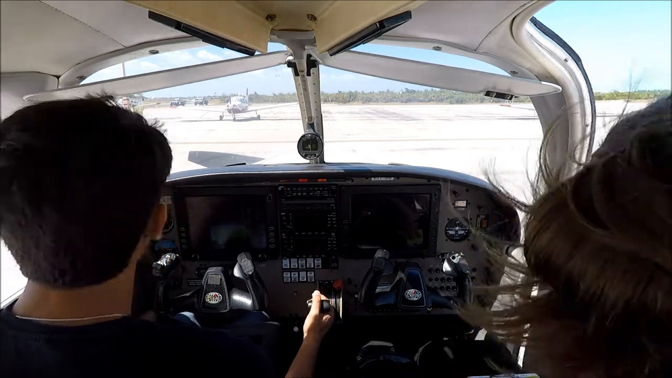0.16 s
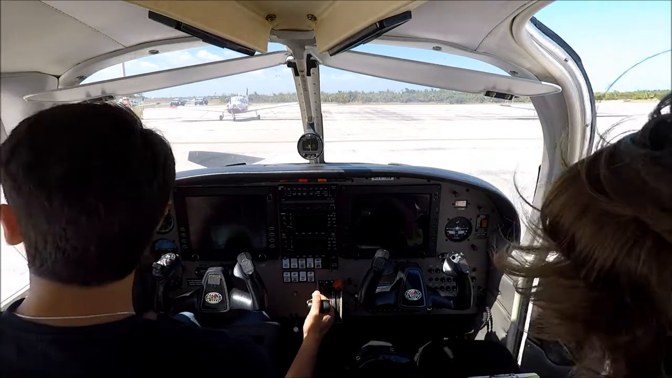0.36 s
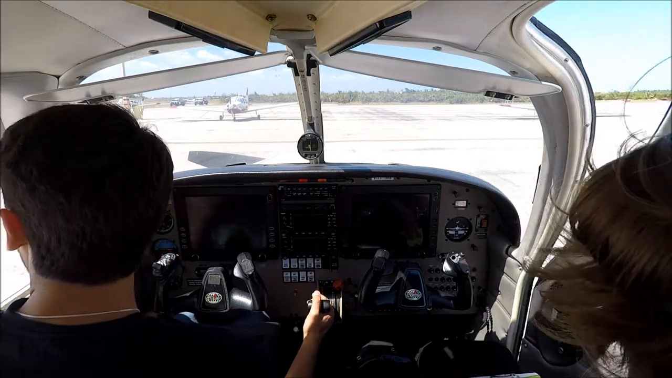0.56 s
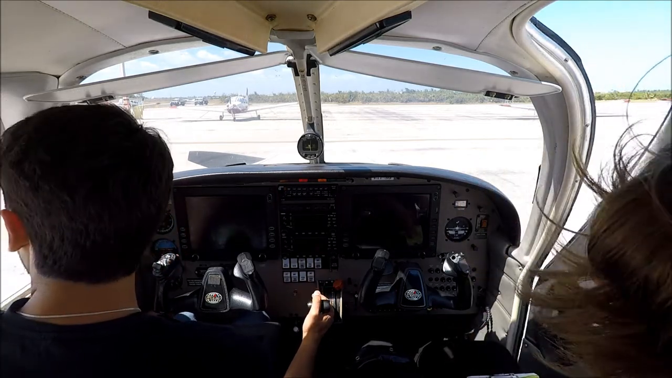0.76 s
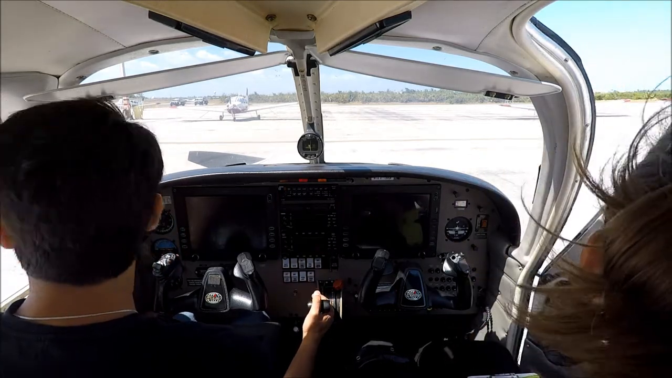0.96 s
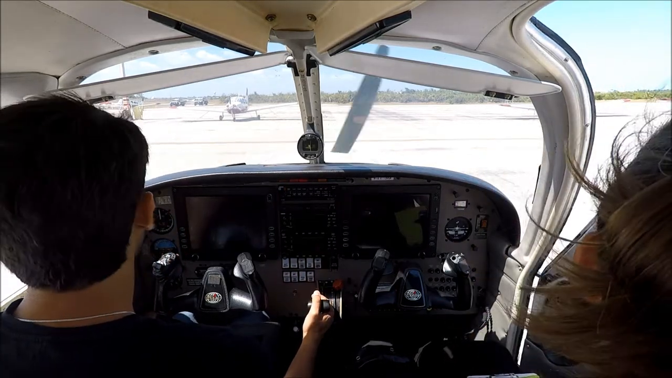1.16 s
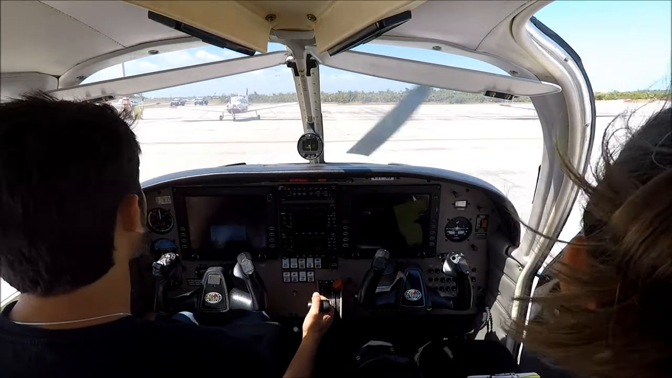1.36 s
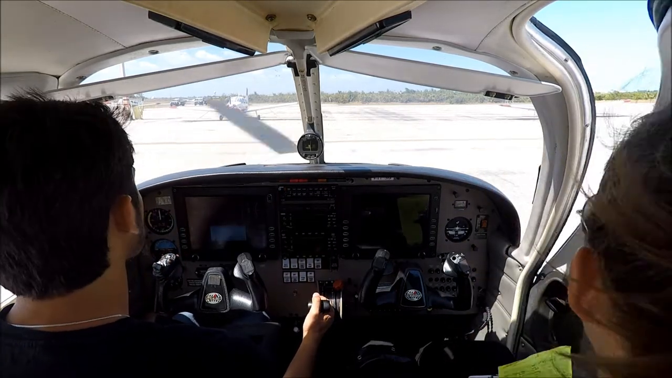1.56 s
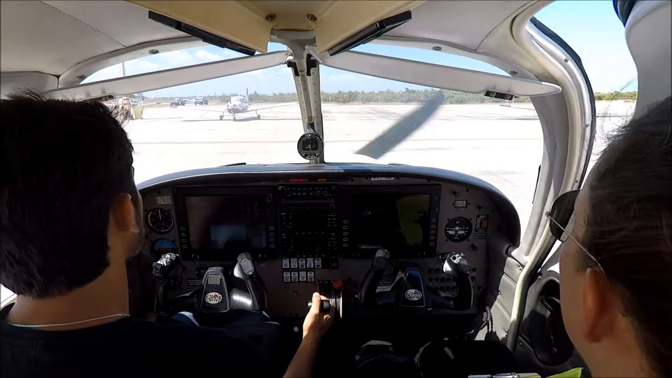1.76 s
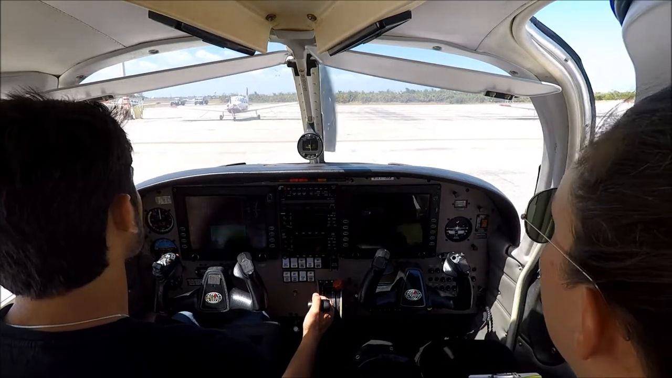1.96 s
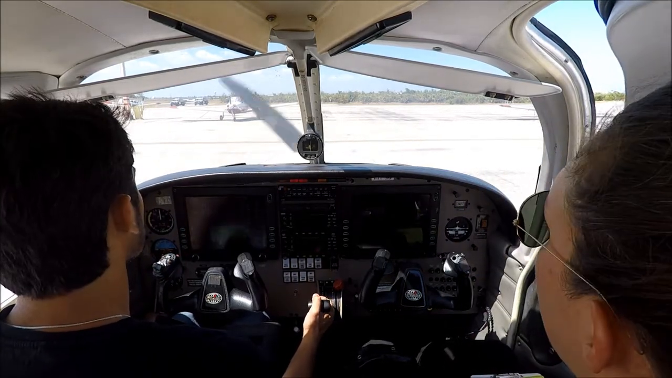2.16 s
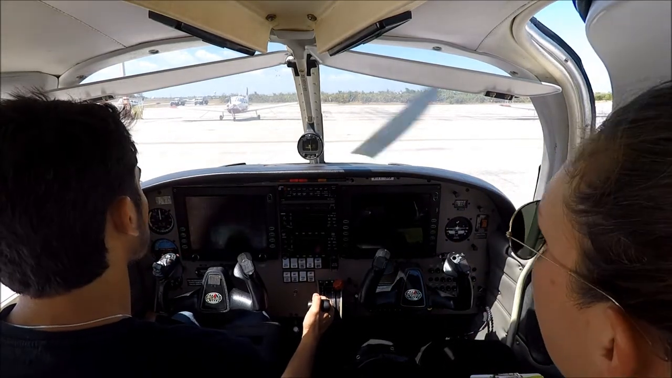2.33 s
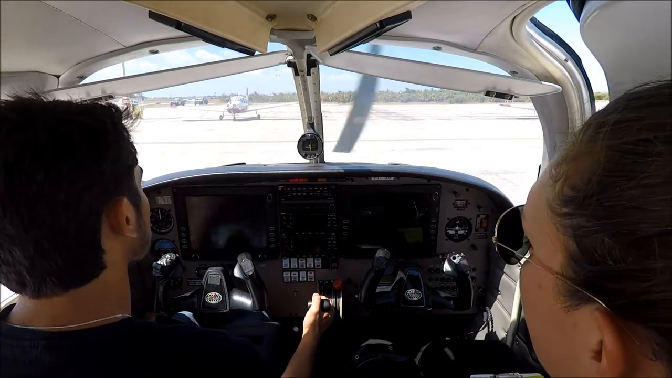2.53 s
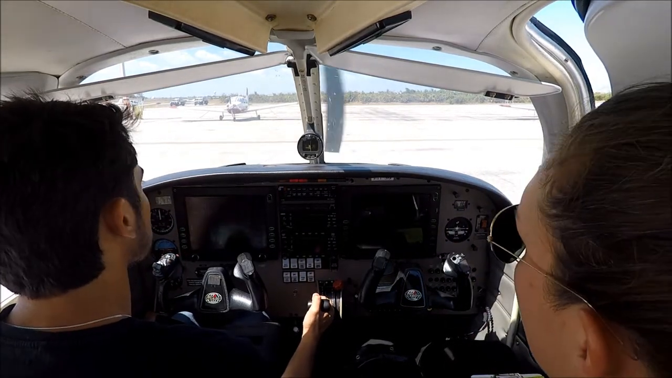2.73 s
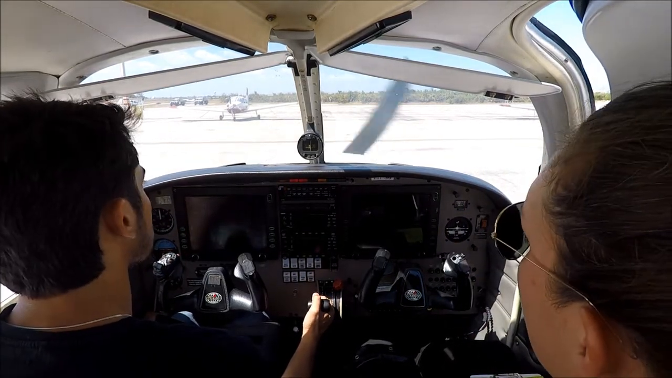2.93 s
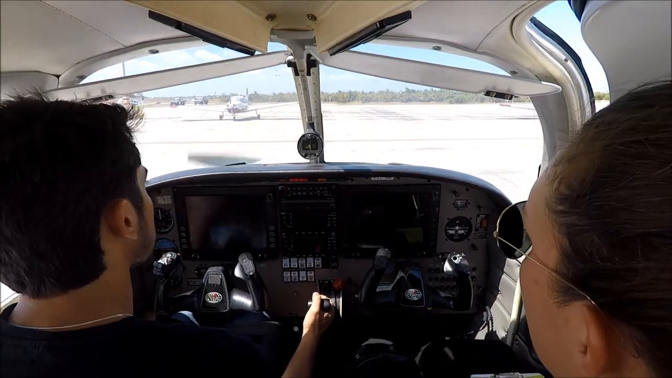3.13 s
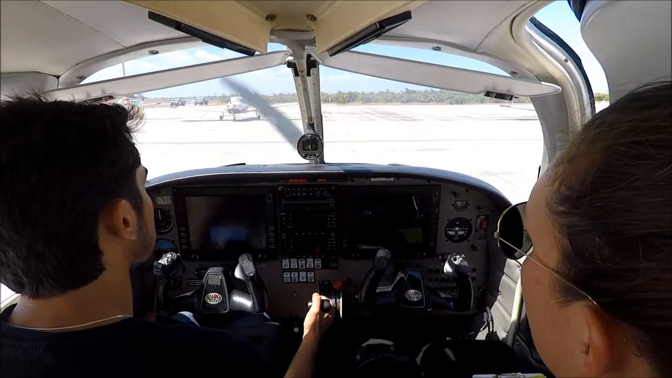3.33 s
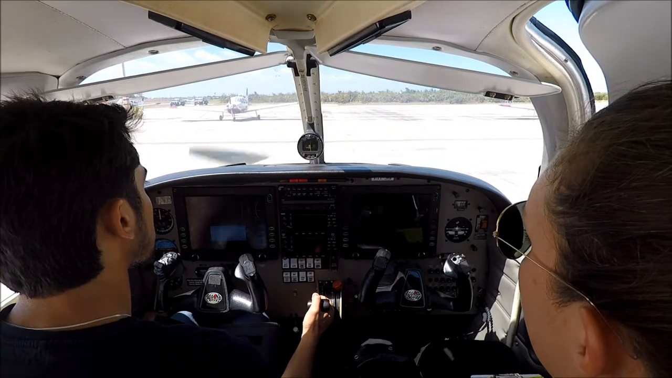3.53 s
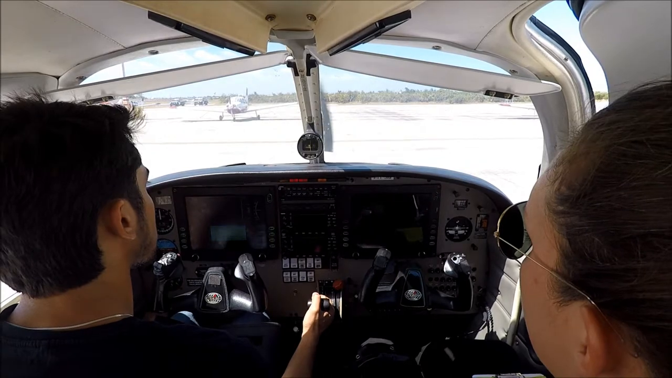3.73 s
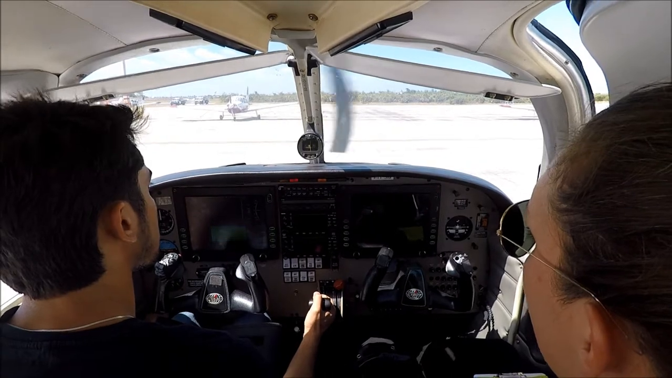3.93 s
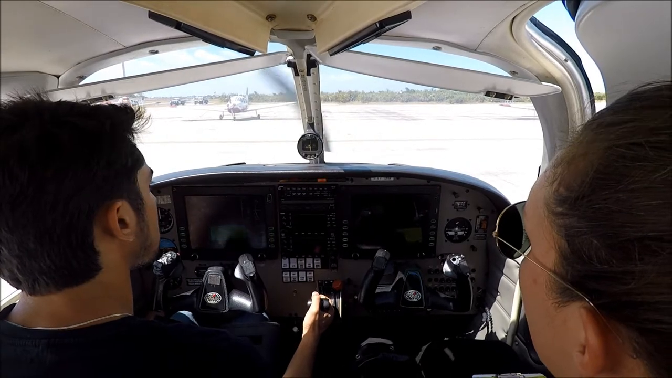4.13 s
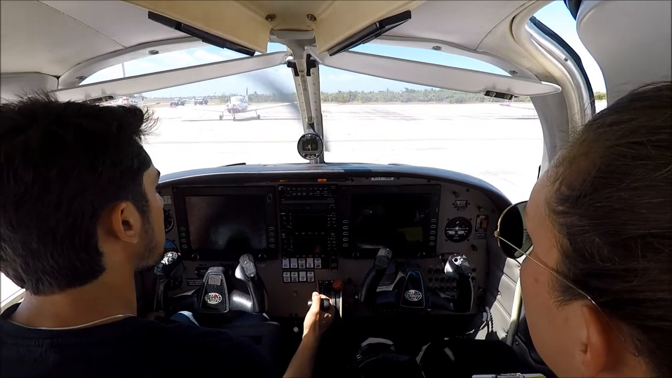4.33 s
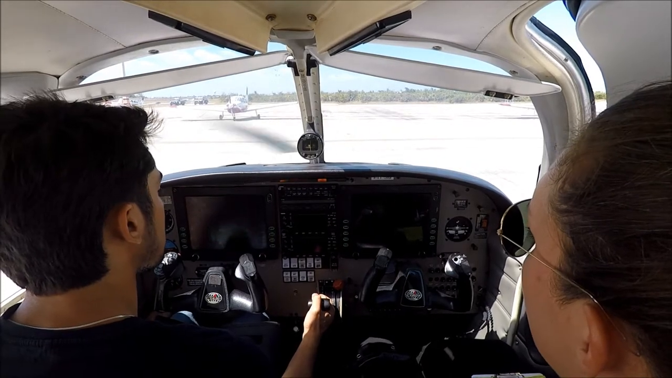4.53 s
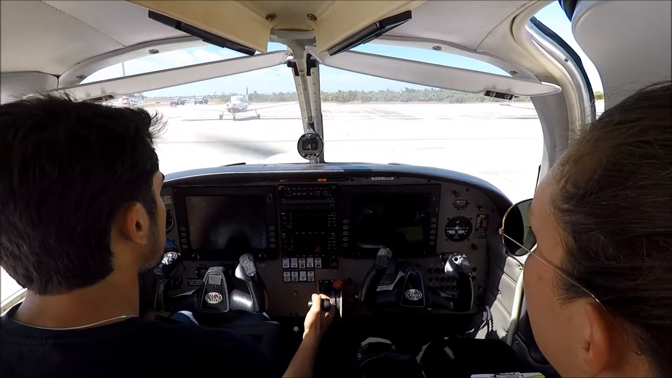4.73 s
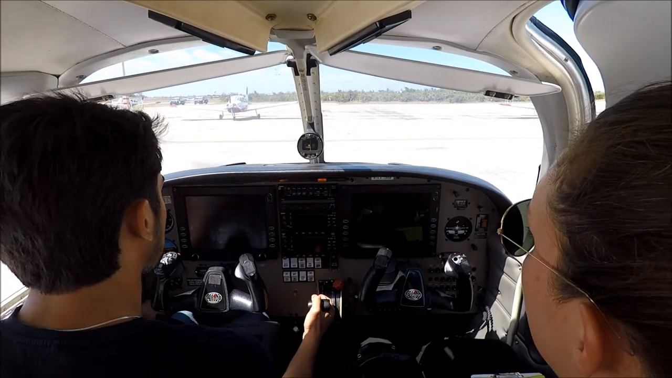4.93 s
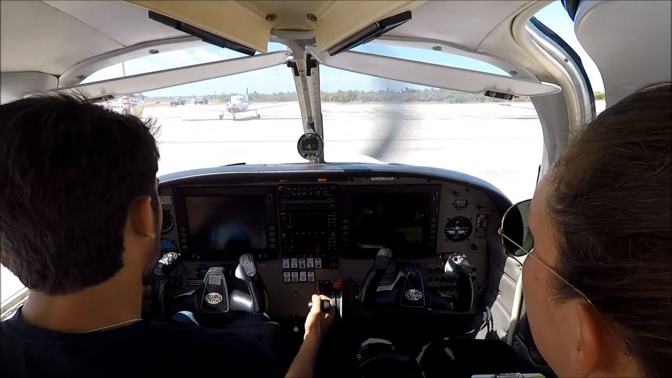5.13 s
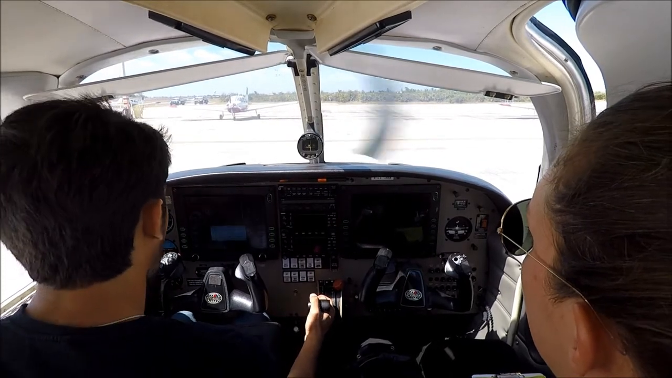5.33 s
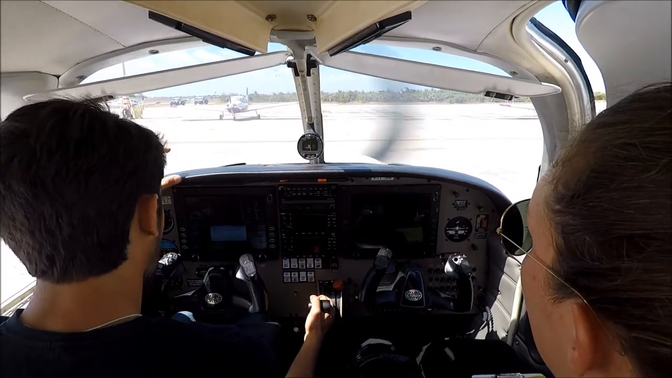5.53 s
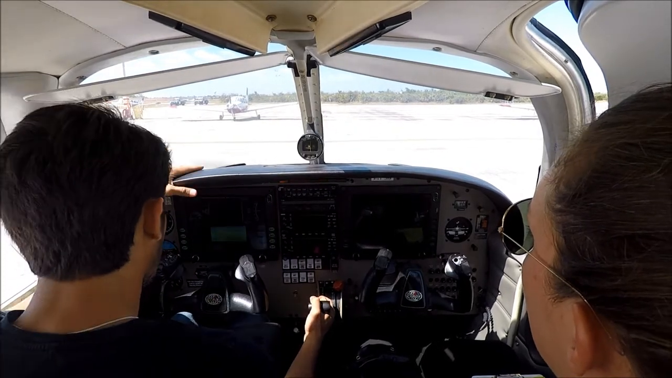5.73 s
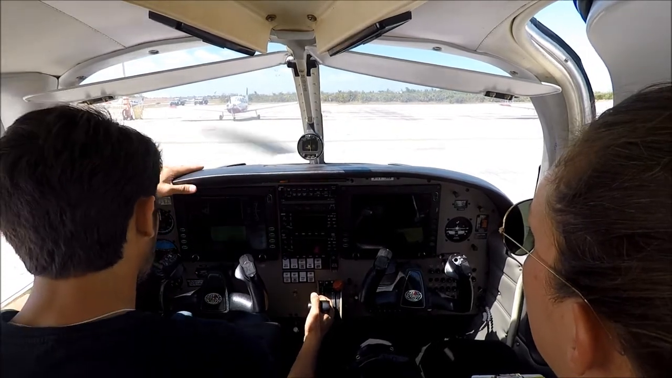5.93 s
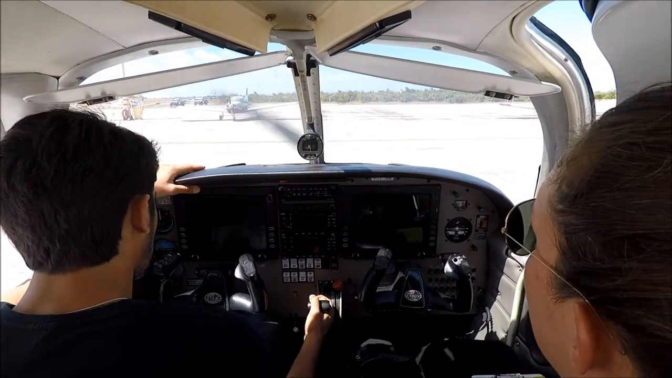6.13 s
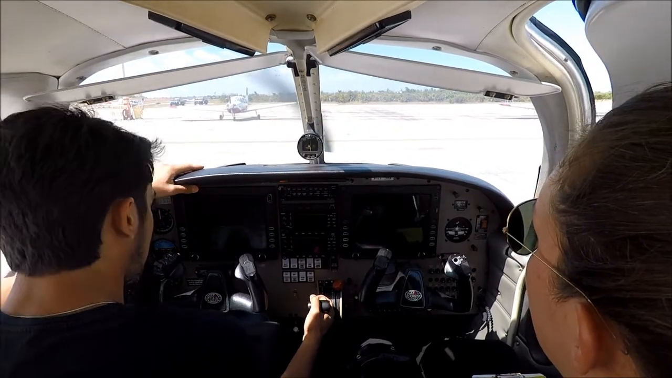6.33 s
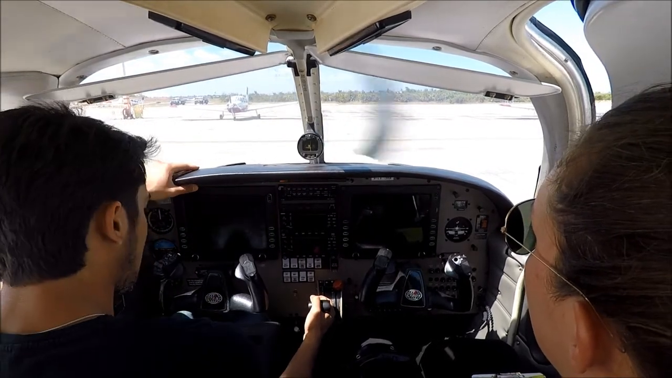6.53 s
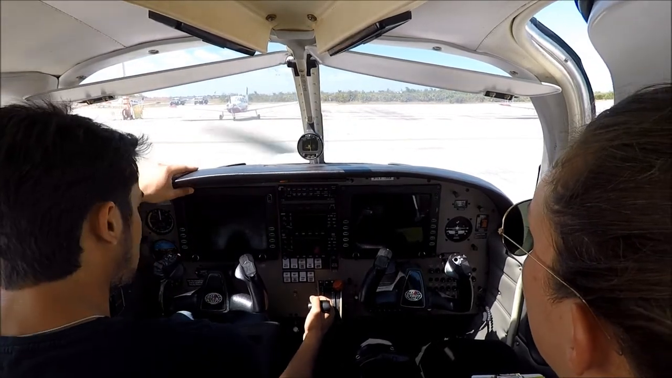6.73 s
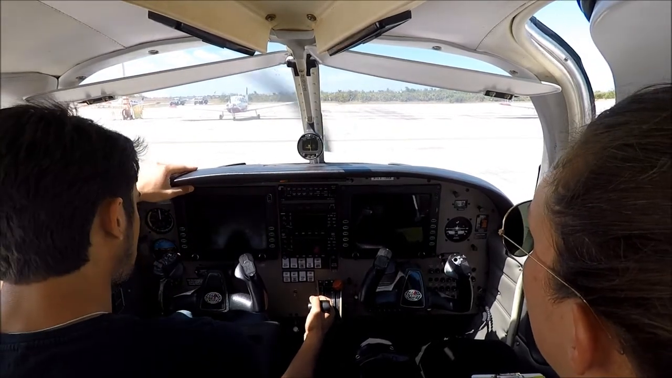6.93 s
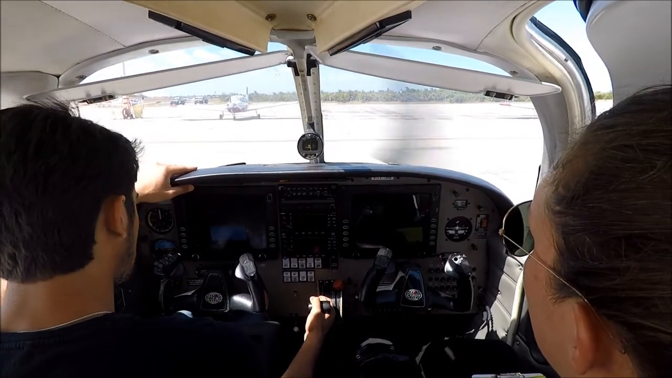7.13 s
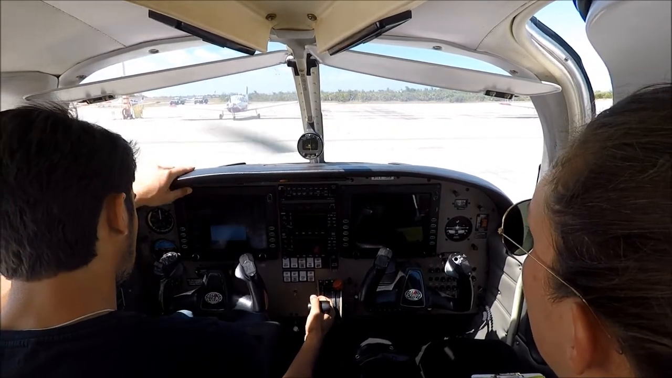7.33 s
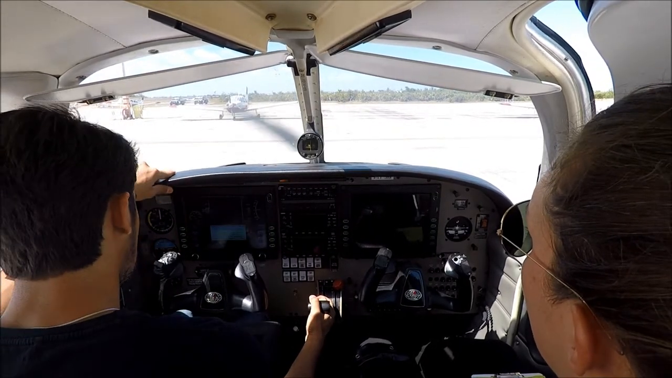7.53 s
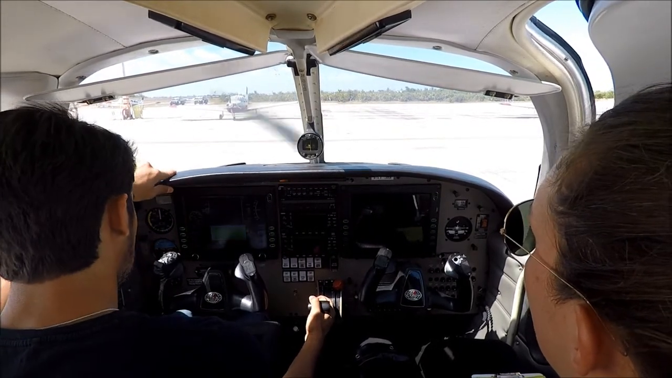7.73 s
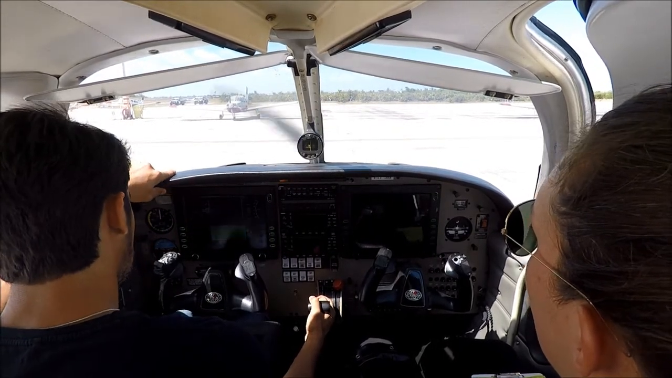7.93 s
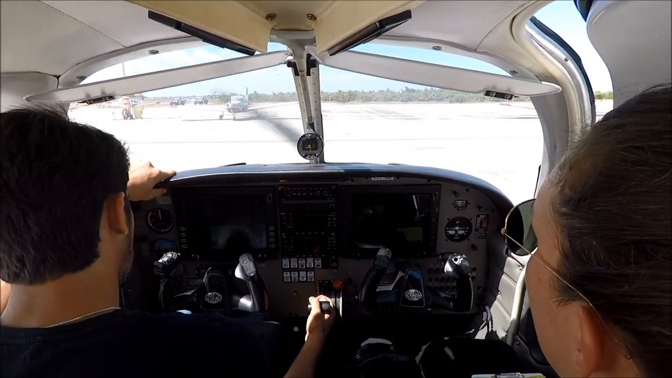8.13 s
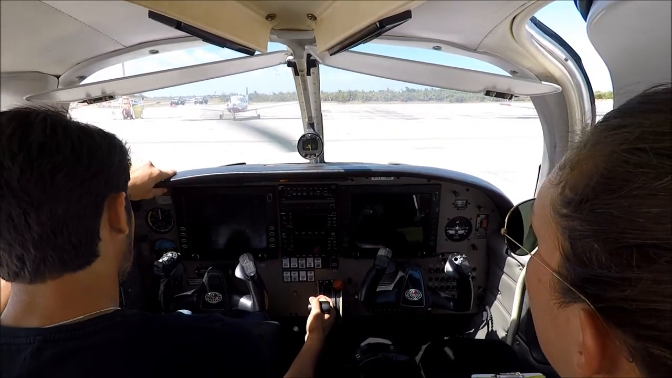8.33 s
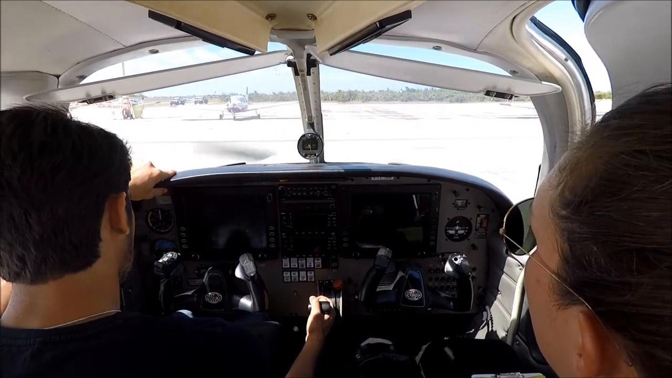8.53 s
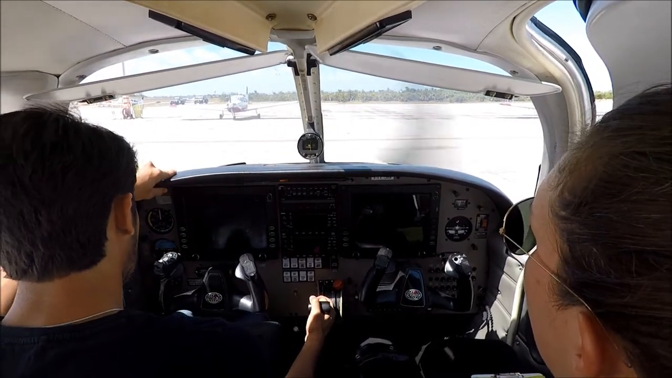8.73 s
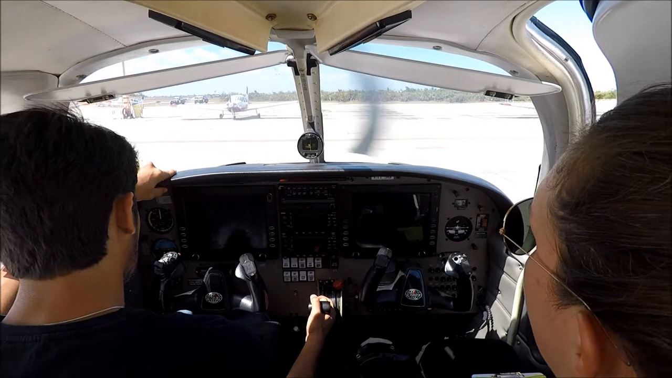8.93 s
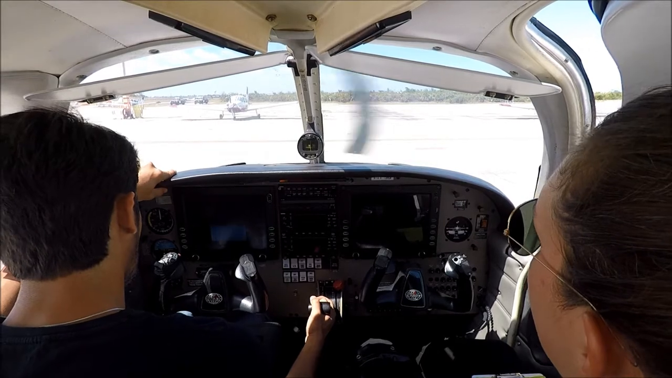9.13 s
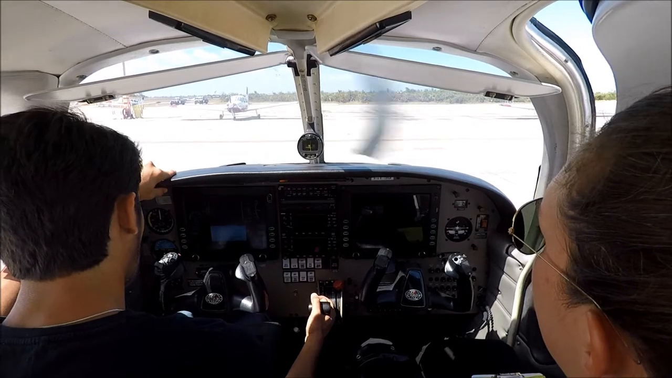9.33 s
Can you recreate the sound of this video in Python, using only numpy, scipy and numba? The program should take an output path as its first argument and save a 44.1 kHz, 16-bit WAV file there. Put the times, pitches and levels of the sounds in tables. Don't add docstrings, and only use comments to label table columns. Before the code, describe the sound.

From inside a small piston aircraft, door open, the first 0.7 seconds are quiet: low breeze on the microphone, faint fan hum, a thin gyro tone, and a bright belt-buckle clink at 0.1 with lesser touches after. A low relay buzz sounds around 0.8, then at 0.95 the starter bites with a cluster of hard metallic knocks and a brief rising gear whine. Until about 3.8 it grinds gritty and harsh, pulsing roughly eight times a second, with squeals, high whistles and deep airframe rocking. Early firings thump at 2.7-3.1, with more knocks at 3.3-3.7. At 3.8-4.0 comes a dense clatter, heavy kick and bright ping as the starter releases. The engine catches, speeds up until 4.5, then holds a deep, boomy 35-per-second throb, with gassy exhaust flutter, irregular dull cracks, a stronger one near 7.4, and wash buffeting, still running at 9.4.

```python
import sys
import numpy as np
from scipy import signal
from scipy.fft import rfft, irfft, next_fast_len
from scipy.io import wavfile
from scipy.ndimage import uniform_filter1d
from numba import njit

SR = 44100
rng = np.random.default_rng(int(sys.argv[2]) if len(sys.argv) > 2 else 0)


def output_pcm(signal):
    pcm = np.clip(np.atleast_2d(signal).T, -1, 1) * 32767
    wavfile.write(sys.argv[1], SR, np.round(pcm).astype(np.int16))


def convert_level_to_amplitude(level_db):
    exponent = np.asarray(level_db, float) / 20
    return 10 ** exponent


N = 417627
T = np.arange(N) / SR


def read(table, fade=.03):
    s, *columns = np.transpose(table)
    gate = np.clip(np.minimum(T - s[0], s[-1] - T) / fade + 1, 0, 1)
    return [np.interp(T, s, c) for c in columns] + [gate]


def latest(s):
    return np.clip(np.searchsorted(s, T) - 1, 0, len(s) - 1)


def unit(x):
    return x / np.sqrt(np.mean(x ** 2))


def walk(rate):
    k = int(SR / rate)
    held = np.repeat(rng.standard_normal(N // k + 1), k)
    return 1.282 * uniform_filter1d(uniform_filter1d(held, k), k)[:N]


@njit
def svf(x, hz, width):
    y, b, l = np.empty(len(x)), 0., 0.
    for i in range(len(x)):
        g, k = np.tan(np.pi * hz[i] / SR), width / hz[i]
        v = (b + g * (x[i] - l)) / (1 + g * (g + k))
        b, l, y[i] = 2 * v - b, l + 2 * g * v, k * v
    return y


def band(hz, width):
    hz = hz + np.zeros(N)
    once = svf(rng.standard_normal(N), hz, 1. * width)
    return unit(svf(once, hz, 1. * width))


def colour(spectrum, flicker_db, rate):
    size = next_fast_len(N)
    octave = np.log2(np.arange(1, size // 2 + 2) * SR / size)
    hz, db = np.transpose(spectrum)
    bins = rfft(rng.standard_normal(size)) * convert_level_to_amplitude(np.interp(octave, np.log2(hz), db, -140, -140))
    out = 0
    for centre in range(int(np.log2(hz[0])), int(np.log2(hz[-1])) + 2):
        part = irfft(bins * np.clip(1 - abs(octave - centre), 0, 1), size)[:N]
        out = out + part * convert_level_to_amplitude(flicker_db * walk(rate))
    return unit(out)


def sine(hz, wobble_hz, rate):
    return np.sqrt(2) * np.sin(2 * np.pi * np.cumsum(hz + wobble_hz * walk(rate)) / SR)


def bursts(times, dbs, rise, t60):
    out = np.zeros(N)
    for s, db, ring in zip(times, dbs, t60 + np.zeros(len(times))):
        i = int(s * SR)
        age = T[:min(int(ring * SR), N - i)]
        attack = np.sin(np.pi / 2 * np.clip(age / rise, 0, 1)) ** 2
        out[i:i + len(age)] += convert_level_to_amplitude(db - 60 * age / ring) * attack
    return out


# level in dB, slope in dB per dB of effort, slope in dB per Hz of rate.
ORDER_DB = [
    (-12, -0.12, -0.5),
    (-25.5, 0.44, -4),
    (-23.5, -0.5, -1.5),
    (-27, 0.5, 0.8),
    (-39.5, 0.5, 3),
    (-42.5, 1.2, 5.5),
]
# time in seconds, coupling to the cabin in dB.
COUPLING = [(4.2, 0.5), (4.9, 2), (5.6, 2), (6.0, 0), (6.9, -5), (7.35, -1), (8.1, 2), (8.55, -1),
            (8.8, -6.5), (9.15, 0), (9.4, 3)]
AIR_MODE_HZ, AIR_MODE_WIDTH_HZ, AIR_MODE_DB = 58, 6.8, 14.5
IDLE_HZ = 35.3


def firing_orders(hz, effort_db, cycles, catch_db):
    boom = 0
    for k, (db, slope, per_hz) in enumerate(ORDER_DB):
        drift = 1.15 * k * (k - 2) / 2 + 0.23 * (k + 0.32) * walk(5)
        tone = np.cos((k + 1) * (2 * np.pi * (cycles - .45)) + drift)
        detune = ((k + 1) * hz - AIR_MODE_HZ) / AIR_MODE_WIDTH_HZ
        level_db = db + 2.5 + AIR_MODE_DB / (1 + detune ** 2)
        level_db = level_db + slope * effort_db + per_hz * np.clip(hz - IDLE_HZ, -1, 1.5)
        level_db = level_db + (0.98 * k + 0.5) * catch_db
        if k in (1, 2):
            level_db = level_db + read(COUPLING)[0]
        level_db = level_db + 1.12 * walk(13) + 0.24 * min(k + 0.31, 2) * walk(2.93)
        boom = boom + convert_level_to_amplitude(level_db) * tone
    return boom


# frequency in Hz, density in dB per Hz.
GAS = [(300, -30), (450, -12.5), (560, -8.5), (750, -11), (1100, -12.5), (1270, -16.5), (1540, -14),
       (1780, -17.5), (1950, -21), (4100, -25.5), (5900, -28), (7000, -43), (9500, -49.5), (11500, -59),
       (15000, -82)]
# frequency in Hz, density in dB per Hz.
DRUM = [(24, -21.5), (40, -7), (86, -9), (150, -13), (175, -17.5), (215, -15), (270, -17.5), (320, -14.5),
        (350, -22), (450, -21), (530, -33), (750, -39)]
GAS_DB, GAS_PER_EFFORT, PIPE_AIR_DB = -34, 0.63, -47.5
DRUM_DB, DRUM_PER_EFFORT = -20.5, 0.81
POP_DB, POP_SCATTER_DB = -47, 5.0
PIPE_HZ, PIPE_WIDTH_HZ = 1440, 300


def exhaust(effort_db, cycles, catch_db):
    size = convert_level_to_amplitude(1.4 * rng.standard_normal(int(cycles[-1]) + 1))[cycles.astype(int)]
    puff = size * np.sin(np.pi * (cycles % 1) ** 0.68) ** 2.9
    gas_db = GAS_PER_EFFORT * effort_db
    gas = convert_level_to_amplitude(GAS_DB + gas_db) * unit(colour(GAS, 1.32, 40) * (1.37 + puff))
    pipe = convert_level_to_amplitude(PIPE_AIR_DB + gas_db + 2.9 * walk(18) + 2 * catch_db) * (0.99 + puff)
    pipe = pipe * band(1560 + 40 * walk(3), 260)
    drum_db = DRUM_DB + DRUM_PER_EFFORT * effort_db + 0.5 * catch_db
    drum = convert_level_to_amplitude(drum_db) * unit(colour(DRUM, 1.9, 8) * (12.0 + puff))
    fired = np.diff(np.floor(cycles - .4), prepend=0) * size ** (POP_SCATTER_DB / 2)
    pops = 0
    for hz, width, gain in ((PIPE_HZ, 300.0, 1), (740, 540.0, 1), (312, 220., 1.55)):
        pops = pops + gain * unit(svf(svf(fired, hz + 0 * T, width), hz + 0 * T, width))
    return gas + pipe + drum + convert_level_to_amplitude(POP_DB + gas_db) * pops


# time in seconds, firing rate in Hz, exhaust effort in dB.
FIRING = [(4.0, 27.22, -38.5), (4.23, 29.6, -46), (4.24, 29.57, -42.5), (4.36, 32.6, -38),
          (4.53, 34.9, -38), (4.94, 34.67, -37), (5.39, 35.08, -35.5), (5.51, 35.5, -38),
          (6.26, 36.07, -37.5), (6.38, 36.62, -39), (6.95, 36.58, -33), (7.5, 35.88, -33.5),
          (7.56, 34.96, -33.5), (7.86, 35.29, -35), (8.47, 34.24, -37.5), (8.8, 34.55, -38.5),
          (9.04, 35.28, -34.5), (9.44, 34.85, -36)]
EFFORT_DB = -37
CATCH_S, CATCH_DB_PER_S = 4.68, 7.5
BUFFET_DB = -20


def engine():
    hz, effort_db, gate = read(FIRING, fade=0.21)
    effort_db = effort_db - EFFORT_DB
    cycles = np.cumsum(hz) / SR
    catch_db = CATCH_DB_PER_S * np.clip(T - CATCH_S, -1, 0)
    boom = firing_orders(hz, effort_db, cycles, catch_db)
    wash = convert_level_to_amplitude(BUFFET_DB + 4.0 * walk(6.2) + 2.0 * walk(11)) * band(19.9, 21)
    return (boom + wash + exhaust(effort_db, cycles, catch_db)) * np.where(T > 5, 1, gate)


# start in seconds, peak in dB.
CRACKS = [(4.365, -24.5), (4.428, -22), (4.484, -16), (4.837, -19), (5.041, -22), (5.302, -16.5),
          (5.408, -22), (5.471, -21), (5.691, -23), (5.78, -20), (5.921, -23), (6.059, -24), (6.201, -18),
          (6.447, -29), (6.502, -29), (6.558, -18), (6.72, -35), (6.779, -27), (6.995, -26), (7.051, -18),
          (7.157, -21), (7.266, -15.5), (7.408, -10), (7.461, -17), (7.52, -15), (7.718, -24.5),
          (7.829, -23), (8.056, -20), (8.406, -30), (8.493, -26), (8.582, -24), (8.665, -34),
          (8.756, -20.5), (8.84, -25), (8.96, -19), (9.185, -18), (9.277, -19)]
CRACK_DB, CRACK_T60_S = -8, 0.041


def cracks():
    s, db = np.transpose(CRACKS)
    gas = band(850, 800) + 0.44 * band(PIPE_HZ, PIPE_WIDTH_HZ) + 0.17 * band(3500, 3800)
    return bursts(s, db + CRACK_DB, 0.0029, CRACK_T60_S) * gas


# start in seconds, level in dB, mount
# resonance in Hz.
KICKS = [(.99, -6.5, 109), (2.744, -7, 130), (2.843, -3.5, 97), (2.944, -10, 90.1), (3.022, -4, 97),
         (3.118, -21, 84.6), (3.3354, -14, 120), (3.81, -10, 130.2), (3.884, 2, 92), (3.987, -14, 200),
         (4.03, -9.5, 90.5)]
KICK_PUSH_S, KICK_WIDTH_HZ, KICK_SLAP_DB = 0.005, 70, -12


def kicks():
    s, db, hz = np.transpose(KICKS)
    push = bursts(s, db + 16.5, KICK_PUSH_S / 2, 3 * KICK_PUSH_S)
    mounts = svf(push, hz[latest(s)], 1. * KICK_WIDTH_HZ)
    return mounts + convert_level_to_amplitude(KICK_SLAP_DB) * svf(push, 300 + 0 * T, 360.0)


# time in seconds, low squeal in Hz, its level in dB, high squeal in Hz, its level in dB.
STROKES = [(1.2594, 3070, -46, 4470, -47), (1.323, 2866, -43, 5650, -56), (1.3794, 2580, -43, 4890, -42.5),
           (1.501, 3040, -37, 4280, -51), (1.6334, 3140, -39.5, 4450, -41), (1.7566, 3340, -43, 4481, -42),
           (1.8841, 3540, -40, 4700, -43), (1.9978, 3700, -38, 4760, -46), (2.1108, 3650, -39.5, 4950, -40),
           (2.216, 3680, -40, 4630, -58), (2.3415, 3820, -44, 5050, -39.5), (2.445, 3830, -42.5, 5260, -52),
           (2.5494, 3840, -39, 5077, -44), (2.65, 2990, -51, 5030, -44), (2.7457, 2900, -54, 4660, -52),
           (2.84, 2730, -65, 5300, -65), (2.9694, 2750, -46, 4664, -40), (3.0294, 3030, -48, 5500, -54),
           (3.115, 3130, -40, 4670, -46), (3.2008, 3060, -43.5, 4685, -38.5),
           (3.298, 2960, -44, 4530, -38.5), (3.4397, 3240, -59, 5810, -58), (3.6022, 3040, -55, 4860, -54),
           (3.7571, 3060, -43, 4720, -36)]


def compressions():
    s, low_hz, low_db, high_hz, high_db = np.transpose(STROKES)
    db = np.maximum(low_db, high_db)
    s = s - .008
    last = latest(s)
    age = np.clip(T - s[last], 0, 1)
    length = np.clip(np.diff(s, append=s[-1] + 0.09), 0, .14)[last]
    load = convert_level_to_amplitude(.5 * (db - np.mean(db)))[last]
    load = load * np.clip(age / 0.026, 0, 1) * np.clip((length - age) / 0.18, 0, 1)
    sag = 1 - 0.81 * np.clip(age, 0, .08)
    low = bursts(s, low_db, .018, .27) * 1.7 * convert_level_to_amplitude(2 * walk(80)) * band(low_hz[last] * sag, 210)
    high = bursts(s, high_db, .018, .27) * 1.7 * convert_level_to_amplitude(2 * walk(80)) * band(high_hz[last] * sag, 220)
    return load, sag, low + high


# time in seconds, strain in dB.
GRIND = [(.94, -11), (.97, 8.5), (1.06, 6), (1.1, 0), (1.17, -5), (1.7, 0), (2.55, 1.5), (2.81, 7),
         (3.2, 2.5), (3.77, 0.5), (3.98, -2), (4.2, -9)]
# frequency in Hz, density in dB per Hz.
GEARS = [(150, -14), (250, -3.5), (314, 3.5), (344, 2), (538, -2.5), (704, -0.5), (1440, -9), (1720, -6.5),
         (2700, -14), (3510, -70), (5940, -120)]
# frequency in Hz, density in dB per Hz.
TEETH = [(2200, -16), (2500, 2.5), (3600, 0.5), (5000, -0.5), (6200, -7.5), (6700, -13), (7600, -25),
         (8200, -14), (9000, -16.5), (10800, -21.5), (12000, -24), (15000, -28)]
GEAR_DB, AIR_DB, AIR_PER_STRAIN = -30, -42, 1.31
RELEASE_S, RELEASE_DB, RELEASE_T60_S = 3.795, -25, .9


def starter():
    strain_db, gate = read(GRIND, fade=0.0092)
    load, sag, squeal = compressions()
    thrown = bursts([RELEASE_S], [RELEASE_DB], 0.0032, RELEASE_T60_S)
    thrown = thrown * np.clip((3.965 - T) / 0.017, .25, 1)
    grind = (convert_level_to_amplitude(GEAR_DB + strain_db - 1.5) + thrown) * colour(GEARS, 3.7, 45) * (0.76 + 0.5 * load)
    air_db = AIR_DB + AIR_PER_STRAIN * strain_db
    first_turns = (T < 1.46) * np.abs(np.cos(np.pi * (T - 1.2) / .22))
    swell = .32 + .9 * load + .45 * first_turns
    air = (convert_level_to_amplitude(air_db + 4.0) + convert_level_to_amplitude(-14.5) * thrown) * colour(TEETH, 1.15, 25.4) * swell
    air = air * np.clip((4.3 - T) / 0.18, 0, 1)
    modes = 1.05 * band(6000 * sag, 320) + 1.9 * band(1800 * sag, 220) + band(2600 * sag, 250)
    modes = modes + .8 * band(3600, 300) + .17 * band(8250 * sag, 400)
    rings = convert_level_to_amplitude(air_db - 8 + 3 * walk(25)) * load * modes
    hiss = convert_level_to_amplitude(air_db - 28 + 4.0 * walk(90)) * load ** 2 * (T < 3.42) * band(13000, 4500)
    return (grind + air) * gate + squeal + rings + hiss


# time in seconds, mesh rate in Hz, level in dB.
WHINE = [(1.065, 1500, -31), (1.1, 1620, -25), (1.125, 1770, -30), (1.16, 1920, -32), (1.2, 1940, -29),
         (1.24, 1830, -32), (1.275, 1900, -37), (1.3, 1850, -64), (1.335, 1830, -43), (1.385, 1700, -30),
         (1.45, 1780, -51), (1.5, 2050, -49), (1.54, 1940, -32), (1.59, 1810, -42.5), (1.64, 1740, -41)]


def pinion_whine():
    hz, db, on = read(WHINE, fade=0.041)
    mesh = band(hz, 190) + convert_level_to_amplitude(-10) * band(2 * hz, 280) + convert_level_to_amplitude(-13.5) * band(3 * hz, 380)
    return convert_level_to_amplitude(db + 6.5) * on * mesh * convert_level_to_amplitude(4 * walk(60) - 10)


# start in seconds, peak in dB, pitch in Hz.
CHIRPS = [(1.1288, -49, 7510), (1.1911, -46, 7680), (1.3283, -51, 8270), (1.4246, -49, 8160),
          (1.6825, -50, 8160), (1.7645, -54, 7870), (1.9426, -51, 8490), (1.9923, -53, 7790),
          (2.1026, -54, 7450), (2.2133, -51, 7526), (2.2685, -50, 8030), (2.4443, -44, 7550),
          (2.5515, -47, 8053), (2.6533, -47, 7820), (2.7867, -45, 8020), (2.8429, -49, 8470),
          (2.9327, -47, 7530), (2.9985, -46, 8355), (3.1282, -49, 8110), (3.3248, -41, 8100),
          (3.3921, -50, 8130), (3.455, -54, 8410), (3.6366, -50, 8340), (3.6934, -51, 8470),
          (4.085, -50, 8500)]
CHIRP_DB, CHIRP_WIDTH_HZ, CHIRP_T60_S = -3.5, 320, 0.14


def chirps():
    s, db, hz = np.transpose(CHIRPS)
    return bursts(s, db + CHIRP_DB, 0.017, CHIRP_T60_S) * band(hz[latest(s)], CHIRP_WIDTH_HZ)


# start in seconds, peak in dB, body in dB, edge in dB.
KNOCKS = [(0.683, -27, -4, -17), (0.96, -10.5, -2, -15.5), (0.981, -26, 16, -12), (1.006, -24, 13.5, -3),
          (1.0294, -36, 13, 1), (1.06, -22, 2, -5), (1.565, -33, 15, -11), (1.813, -18, 0.5, -9.5),
          (2.7489, -18, -4, -22), (2.838, -17, 5.5, -12), (2.932, -21.5, -8, -3.5),
          (3.0242, -18.5, -20, -11), (3.32, -37.5, 19, -2), (3.335, -37.5, 20.5, -10),
          (3.5281, -19.5, 0, -10), (3.6028, -16.5, -9, -11), (3.681, -22.5, -18, -7), (3.798, -10.5, 1, -6),
          (3.804, -16.5, -14, -7.5), (3.8297, -11, -6, -14), (3.8445, -25, -11, -6), (3.866, -10.5, 1, -10),
          (3.8846, -20, 5.5, -4), (3.905, -20, -1, -4), (3.9247, -29, 11, 4), (3.9843, -39, -8, 7)]
# frequency in Hz, width in Hz, 60 dB decay in seconds, trim in dB.
KNOCK_HZ = [
    (127, 100, 0.14, 3),
    (470, 720, 0.11, -4.5),
    (1700, 790, 0.058, -2),
    (3470, 2000, 0.12, -4.5),
    (5630, 900, 0.079, -5),
]
THUD_DB, TOP_DB = -11.5, -9


def knocks():
    s, db, body_db, edge_db = np.transpose(KNOCKS)
    shares = (THUD_DB, body_db, 0, edge_db, edge_db + TOP_DB)
    blows = 0
    for share_db, (hz, width, t60, trim_db) in zip(shares, KNOCK_HZ):
        blows = blows + bursts(s - .003, db + share_db + trim_db, 0.0085, t60) * band(hz, width)
    return unit(convert_level_to_amplitude(1.1 * walk(400))) * blows


# start in seconds, level in dB, resonance in Hz.
RAPS = [(.948, -27, 3600), (.957, -18, 3600), (.9635, -14, 1600), (0.968, -23, 3550), (0.973, -13, 1490),
        (0.984, -20.5, 1110), (.998, -18, 900), (1.008, -22, 2600), (1.021, -28, 2500),
        (1.039, -28.5, 3300), (1.061, -21, 2300), (1.069, -25, 920), (1.268, -22, 900), (1.573, -22, 697),
        (2.755, -21, 1700), (2.844, -16, 1500), (2.928, -28, 600), (3.292, -22, 882), (3.337, -13, 950),
        (3.528, -28, 1800), (3.536, -30, 2900), (3.558, -22, 1797), (3.604, -32, 1900), (3.614, -27, 2900),
        (3.68, -27, 2800), (3.687, -25, 1800), (3.806, -10.5, 2600), (3.813, -22, 4010), (3.83, -21, 1700),
        (3.834, -13.5, 3730), (3.845, -22, 1800), (3.868, -13, 1600), (3.878, -20, 1700),
        (3.886, -28, 3180), (3.895, -32, 2200), (3.905, -28, 1000), (3.913, -34, 3000)]
RAP_Q, RAP_T60_S = 3.1, 0.048


def raps():
    s, db, hz = np.transpose(RAPS)
    pitch = hz[latest(s)]
    noise = rng.standard_normal(N) * np.sqrt(SR / pitch) * 0.87
    rung = 0
    for centre in (750., 1500., 3000.):
        near = abs(np.log(pitch / centre)) <= np.log(2) / 2
        width = centre / RAP_Q
        rung = rung + near * svf(svf(noise, pitch, width), pitch, width)
    return bursts(s, db, 0.0031, RAP_T60_S) * rung


# start in seconds, peak in dB.
TICKS = [(.963, -44), (1.01, -43), (1.062, -43), (3.8, -43), (3.804, -48), (3.823, -47), (3.833, -43),
         (3.871, -49), (3.877, -48), (3.887, -40), (3.898, -50), (3.903, -47), (3.913, -46), (3.919, -46),
         (3.925, -43), (3.93, -48), (3.941, -48), (3.946, -50), (3.956, -48)]


def ticks():
    s, db = np.transpose(TICKS)
    return bursts(s, db - 10, .001, .008) * band(12000, 5000)


# start in seconds, peak in dB.
PINGS = [
    (3.921, -24.5),
    (3.982, -31),
]
PING_HZ, PING_WIDTH_HZ, PING_T60_S = 5660, 1200, 0.073


def pings():
    s, db = np.transpose(PINGS)
    return bursts(s, db, 0.0035, PING_T60_S) * band(PING_HZ, PING_WIDTH_HZ)


# time in seconds, rocking in dB, boom in Hz, boom in dB, panels in dB.
SHAKE = [
    (0, -34, 43.86, -26, -23),
    (.7, -28.5, 43.7, -24, -39),
    (1.02, -15, 51.4, -15.5, -51),
    (1.45, -12.5, 50.6, -24.5, -33),
    (1.56, -14, 40, -22.5, -41),
    (2.2, -13, 41.21, -19, -34.5),
    (2.6, -20, 54.27, -14.5, -22.5),
    (3.2, -11.5, 40, -17, -30),
    (4.0, -12.5, 42.13, -16.5, -22.5),
]
ROCK_HZ = 27.9


def airframe():
    rock_db, boom_hz, boom_db, panel_db, gate = read(SHAKE, fade=0.165)
    rock = convert_level_to_amplitude(rock_db + 2.0 * walk(6.84) + 2.9 * walk(25.01))
    rock = rock * sine(ROCK_HZ + 2.534 * walk(4), 2.83, 30.07)
    sway = convert_level_to_amplitude(rock_db - 3.5) * band(14.7, 9.9)
    boom = convert_level_to_amplitude(boom_db + 3.4 * walk(9) + 2.0 * walk(29.94)) * sine(boom_hz, 3.69, 35)
    door = convert_level_to_amplitude(boom_db - 5.0) * band(62.6, 10.0)
    panels = convert_level_to_amplitude(panel_db - 6.0) * (band(107.5, 73) + 0.73 * band(215.6, 80))
    return (rock + sway + boom + door + panels) * np.clip((4.2 - T) / 0.36, 0, 1)


# start in seconds, peak in dB, panel mode in Hz, decay as a multiple of 1 s.
SURGES = [(1.12, -26, 117, 2.2), (3.08, -24.5, 99, 0.9), (3.4, -27, 135, 0.91), (4.12, -26.5, 140, 1.1),
          (4.75, -29.5, 288.5, 2), (5.2, -34.5, 400, 2.8), (6.55, -27, 190.1, 2.7),
          (6.75, -31.5, 442.2, 3.), (7.5, -34, 310, 2.), (7.9, -26, 191, 2.), (8.25, -30.5, 302, 1.98),
          (9.1, -25.5, 370, 2.59)]
SURGE_RISE_S, SURGE_T60_S, SURGE_WIDTH_HZ = .15, 1., 65


def surges():
    out = 0
    for s, db, hz, ring in SURGES:
        out = out + bursts([s], [db], SURGE_RISE_S, SURGE_T60_S * ring) * band(hz, SURGE_WIDTH_HZ)
    return out


# start in seconds, peak in dB, low part in dB, top part in dB.
BUCKLE = [
    (0.12, -21, -2.5, -16.5),
    (0.1274, -24.5, -8, -24),
    (0.1334, -36, -5, -17),
    (0.1464, -39, -12, -10),
    (.262, -46, 2, -5.5),
    (.28, -48, -5, -9),
    (.588, -46, 0, -7),
    (.741, -49, 2, -11),
    (.85, -42, 9, -9),
]


def buckle():
    s, db, low_db, top_db = np.transpose(BUCKLE)
    layers = ((7060, 2000, db), (2640, 1800, db + low_db), (1200, 1300, db + low_db - 10),
              (10600, 5900, db + top_db), (13600, 900, db + top_db - 7))
    return sum(bursts(s, g - 5, 0.00098, 0.057) * band(hz, width) for hz, width, g in layers)


# time in seconds, pitch in Hz, level in dB.
GYRO = [
    (0.0, 921, -54),
    (0.85, 976, -51),
    (0.892, 910, -63),
    (0.94, 987.0, -55),
]
# time in seconds, pitch in Hz, level in dB.
BUZZ = [
    (.778, 160.4, -28),
    (.797, 171.7, -13),
    (.84, 163, -11),
    (.862, 174.4, -11.5),
    (.875, 164, -42),
]


def instruments():
    hz, db, gate = read(GYRO, fade=0.29)
    gyro = convert_level_to_amplitude(db + 3 + 1.5 * walk(24.8)) * gate * sine(hz, 6, 38.7)
    hz, db, gate = read(BUZZ, fade=.005)
    turn = 2 * np.pi * np.cumsum(hz) / SR
    wave = np.cos(turn) + convert_level_to_amplitude(-15.0) * np.cos(2 * turn) + convert_level_to_amplitude(-25.0) * np.cos(3 * turn)
    return gyro + convert_level_to_amplitude(db - 1.5) * gate * wave


# time in seconds, fans in dB, breeze on the ports in dB.
CABIN = [
    (0, -44, -22),
    (.7, -40.5, -33.5),
    (1.2, -37.5, -33.5),
    (3.9, -50, -62),
    (9.47, -48.5, -55.5),
]
# frequency in Hz, density in dB per Hz.
FANS = [(330, -30.5), (500, -3), (700, -21), (950, -1.5), (1090, -13), (1500, -12), (2050, -23),
        (2600, -16), (4000, -23.5), (6300, -27), (7400, -33.5), (9800, -32.5), (12500, -44.5), (14300, -55)]
# frequency in Hz, width in Hz, level in dB.
FAN_TONES = [(701.7, 37, 3), (972, 53, 0), (1503, 14, -5), (1830, 55, -6), (2450, 120, -7), (3900, 60, -18),
             (4000, 52, -19)]


def fans():
    hums = sum(convert_level_to_amplitude(db) * band(hz, width) for hz, width, db in FAN_TONES)
    return convert_level_to_amplitude(read(CABIN)[0]) * (colour(FANS, 2.6, 14) + convert_level_to_amplitude(-2.5) * unit(hums))


# frequency in Hz, density in dB per Hz.
BREEZE = [(45, -13), (90, 5), (203, -6), (299, -5), (344, -4.5), (526, -15), (613, -12), (1500, -42.5),
          (1950, -69.5), (3300, -120)]


def breeze():
    return convert_level_to_amplitude(read(CABIN)[1]) * colour(BREEZE, 1.1, 9.5)


FOLD_S = 0.24


def port_difference(mid):
    side = convert_level_to_amplitude(-22.5) * colour(BREEZE, 1.6, 15) + convert_level_to_amplitude(-33) * band(41, 14)
    side = side + convert_level_to_amplitude(-56) * colour(FANS, 1.7, 12) + .8 * buckle()
    side = (side - 0.27 * mid) * np.clip(np.exp(-T / FOLD_S), 0, 1)
    treble = signal.sosfilt(signal.butter(6, 11800, "high", fs=SR, output="sos"), mid)
    return side + 0.48 * np.roll(treble, shift=40)


def scene():
    mid = engine() + cracks() + kicks()
    mid = mid + starter() + pinion_whine() + chirps()
    mid = mid + knocks() + raps() + ticks() + pings()
    mid = mid + airframe() + surges() + buckle() + instruments() + fans() + breeze()
    side = port_difference(mid)
    return np.array([mid + side, mid - side])


def roll_off(x):
    return signal.sosfilt(signal.butter(12, 15140, fs=SR, output="sos"), x)


def record(dry):
    bass = signal.sosfilt(signal.butter(1, 260, fs=SR, output="sos"), dry)
    soft = np.tanh(bass) + .9 * (dry - bass)
    soft = soft / (1 + (soft / .93) ** 6) ** (1 / 6)
    return roll_off(soft)


dry = scene()
out = record(dry)
output_pcm(out)
```